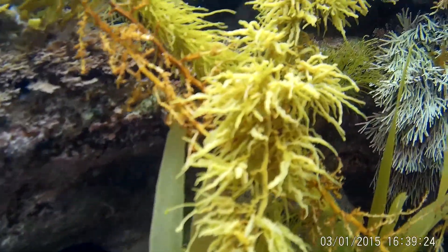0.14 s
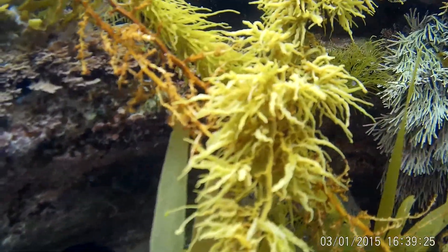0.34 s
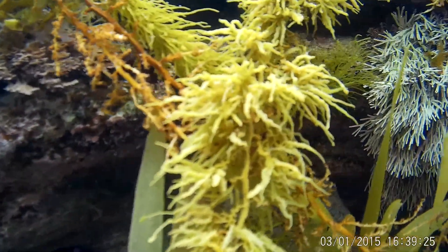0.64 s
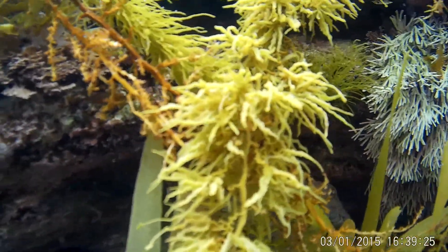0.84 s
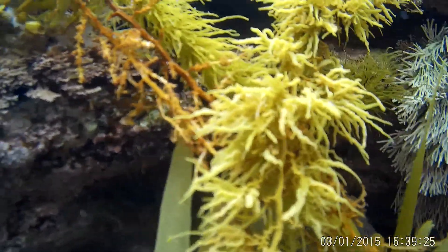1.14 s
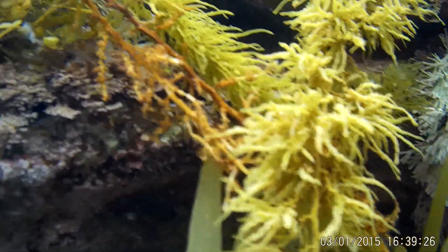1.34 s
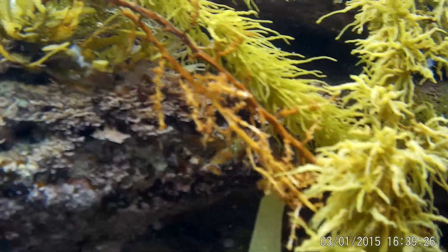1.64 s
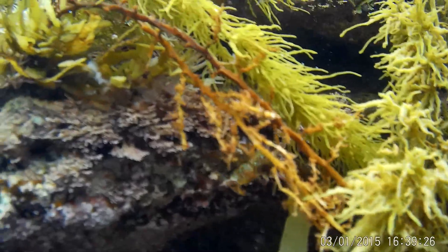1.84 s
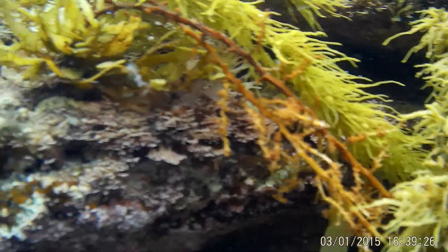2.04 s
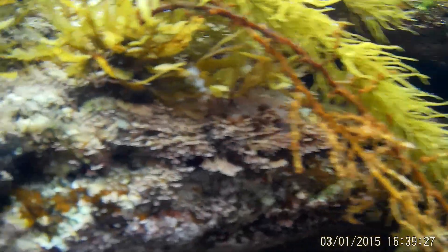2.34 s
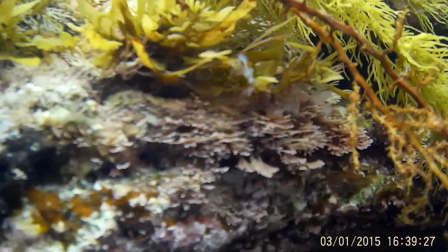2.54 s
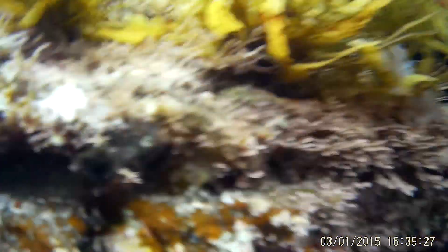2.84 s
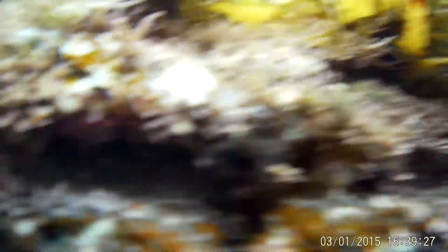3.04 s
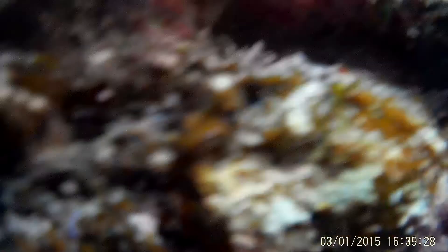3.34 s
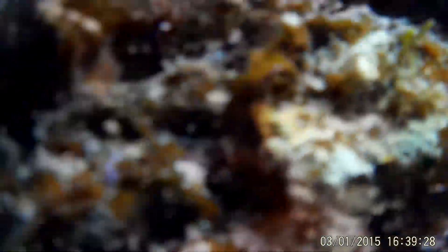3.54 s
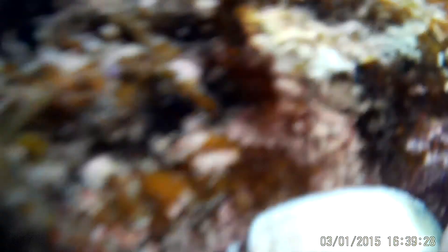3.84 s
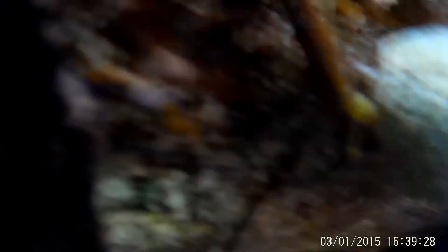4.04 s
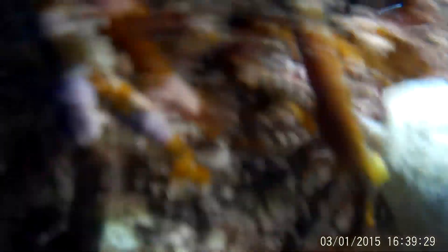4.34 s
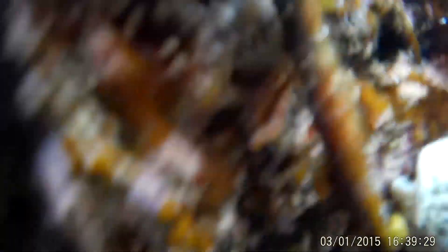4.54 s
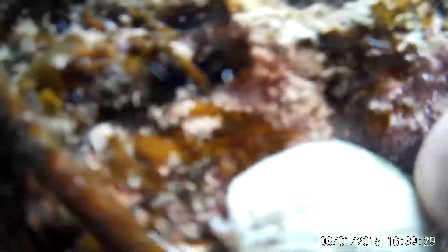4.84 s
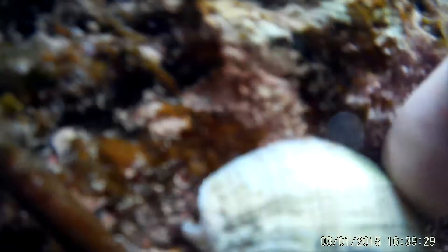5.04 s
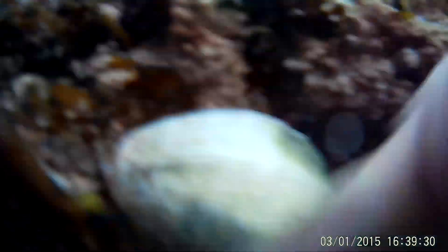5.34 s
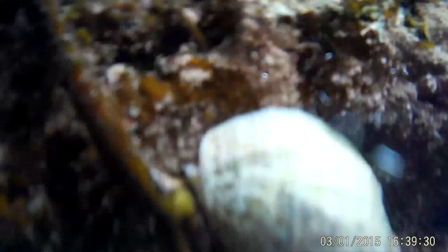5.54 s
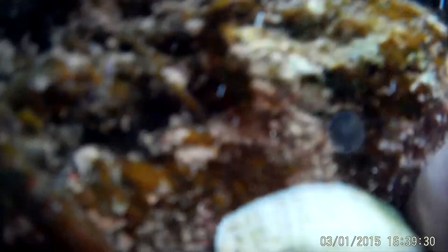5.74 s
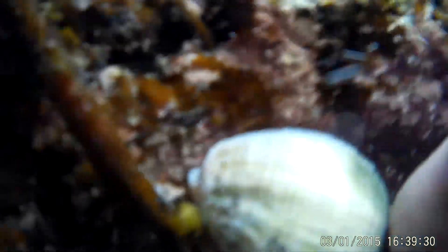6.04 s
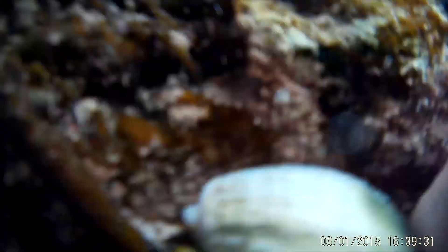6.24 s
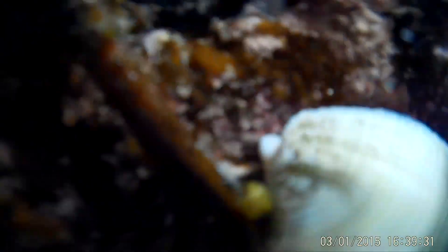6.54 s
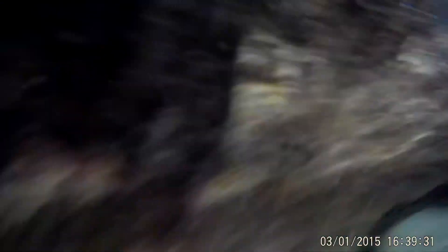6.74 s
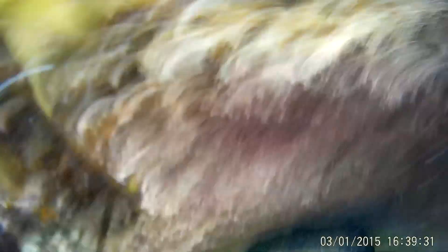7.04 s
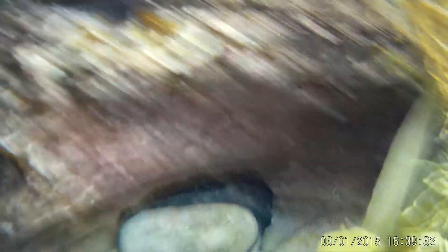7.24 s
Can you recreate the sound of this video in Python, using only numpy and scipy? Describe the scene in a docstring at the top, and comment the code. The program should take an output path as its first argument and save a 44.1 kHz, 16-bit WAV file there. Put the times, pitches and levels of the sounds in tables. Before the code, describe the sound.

Underwater in a rock pool, a microphone inside a plastic case first picks up only soft hiss, a thin whine and a faint focusing motor. Then a gritty rustle begins as the case pushes between rocks. Close, hollow knocks, bright shell snaps and short crunchy scrapes follow in uneven bursts, growing denser and louder toward the end, with low bumps and a soft rumble of water underneath.

```python
"""A faint lens drive whirrs over electronic hiss and whine, heard from inside a plastic camera housing.
From about 2.5 s the housing is pushed into a gap in a shallow rock pool: it rubs over weed, then knocks
and drags on encrusted rock, which rings its walls and faceplate. Shell edges snap against it with a short
bright ring, crust breaks off, and shoves thump through the case over the slow push of the water."""
import sys
import numpy as np
from scipy import signal
from scipy.fft import rfft, irfft, next_fast_len
from scipy.io import wavfile
from scipy.ndimage import uniform_filter1d, minimum_filter1d, map_coordinates

SR = 44100
rng = np.random.default_rng(int(sys.argv[2]) if len(sys.argv) > 2 else 0)


def master(y):
    """Save y as 16-bit WAV."""
    cut = np.clip(np.atleast_2d(y).T, -1, 1)
    pcm = np.round(cut * 32767)  # scale
    wavfile.write(sys.argv[1], SR, pcm.astype(np.int16))


N = 325899


def amp(db):
    """Decibels to gain."""
    return 10 ** (np.asarray(db) / 20)


def unit(x):
    """Scale to rms 1."""
    return x / np.sqrt(np.mean(x ** 2) + 1e-20)


def unit_hit(x):
    """Scale to rms 1 over the first 6 ms."""
    return x / np.sqrt(np.mean(x[:round(0.006 * SR)] ** 2) + 1e-20)


def clock(length=N):
    """Seconds at each sample."""
    return np.arange(length) / SR


def curve(rows):
    """(time, value) rows interpolated per sample."""
    return np.interp(clock(), *np.transpose(rows))


def wobble(rate_hz):
    """Smooth random curve, rate_hz knots a second."""
    knots = rng.standard_normal(int(N * rate_hz / SR) + 4)
    return map_coordinates(knots, [clock() * rate_hz], order=2)


def gate(start_s, end_s, edge_s):
    """1 between two times, with linear edges."""
    return np.clip(np.minimum(clock() - start_s, end_s - clock()) / edge_s + .5, 0, 1)


def add(track, time_s, sound):
    """Mix a sound in at time_s."""
    room = track[max(round(time_s * SR), 0):][:len(sound)]
    room += sound[:len(room)]


def resonate(x, modes):
    """Parallel resonators of alternating polarity."""
    size = next_fast_len(len(x) + 4096)
    f = np.fft.rfftfreq(size, 1 / SR)
    response = sum((-1) ** k * amp(db) * 1j * f * width_hz / (hz * hz - f * f + 1j * f * width_hz)
                   for k, (hz, width_hz, db) in enumerate(modes))
    return irfft(rfft(x, size) * response, size)[:len(x)]


def colour(x, spectrum):
    """Minimum-phase filter through (frequency [Hz], level [dB]) points."""
    size = 8192
    hz, db = np.transpose(spectrum)
    shape_db = np.interp(np.log(np.fft.rfftfreq(size, 1 / SR) + 1), np.log(hz), db)
    cepstrum = irfft(np.log(amp(shape_db) + 1e-6))
    cepstrum[1:size // 2] *= 2
    cepstrum[size // 2 + 1:] = 0
    return signal.fftconvolve(x, irfft(np.exp(rfft(cepstrum))))[:len(x)]


def band(x, low_hz, high_hz):
    """Band-pass: a panel radiates nothing under its first mode, a blunt contact has no fast motion."""
    return signal.sosfilt(signal.butter(4, [low_hz, high_hz], "band", fs=SR, output="sos"), x)


def wander(x, depth_db, patch_ms):
    """The contact point wanders, so each band swells and fades by itself."""
    frames = dict(nperseg=176, noverlap=132)  # 1 ms hop
    spectra = signal.stft(x, **frames)[2]
    field = uniform_filter1d(rng.standard_normal(spectra.shape), size=3, axis=0)
    field = uniform_filter1d(field, size=patch_ms, axis=1)
    gain = amp(depth_db * np.clip(unit(field), -2, 2))
    return signal.istft(spectra * gain, **frames)[1][:len(x)]


def crunch(decay_s, spike, power=1):
    """Force of one contact: a spike, then crumbling that dies away."""
    t = clock(SR // 16)
    force = rng.standard_normal(len(t)) * np.exp(-(t / decay_s) ** power)
    force[0] = spike * np.linalg.norm(force)
    return force


def grains(per_s, spread_db, smooth):
    """Micro-slips of uneven size on a bed of smooth friction."""
    sizes = amp(spread_db * np.minimum(rng.exponential(size=N), 4)) * rng.standard_normal(N)
    slips = sizes * (rng.random(N) < per_s / SR)
    return unit(slips) + smooth * rng.standard_normal(N)


# wall and faceplate modes: (frequency [Hz], width [Hz], level [dB])
WALL_MODES = [(337.2, 65, -2.5), (536.5, 45.4, -2.5), (707, 215, -10.5)]
PLATE_MODES = [(1252, 103, 5), (1439, 247, 4), (1815, 1050, -3.5), (2790, 1300, -4.5)]
# crumbling crust: (frequency [Hz], level [dB])
GRIT_SPECTRUM = [(1120, -19.5), (1900, -6.5), (2640, -1.5), (2970, -6.5), (3360, 1), (4240, -1.5),
                 (5590, 2), (6160, -4.5), (7770, 2), (9210, -6), (9980, -13), (14600, -23), (16000, -39)]


def impact(wall_db, plate_db, crack_db):
    """One blow rings the walls and faceplate and cracks the crust."""
    damping = np.exp(-(clock(SR // 16) / 0.0011) ** 2) + amp(1)  # the first swings ring about twice as strong for a millisecond
    wall = resonate(crunch(decay_s=0.00076, spike=1.07), WALL_MODES) * damping
    wall = unit_hit(band(wall, low_hz=174, high_hz=956))
    reach_hz = np.interp(crack_db - plate_db, [-20, 0], [1850, 3400])  # sharper contact, brighter plate
    plate = resonate(crunch(decay_s=0.0015, spike=2.2), PLATE_MODES) * damping
    plate = unit_hit(band(plate, low_hz=1025, high_hz=reach_hz))
    crack = colour(crunch(decay_s=0.0028, spike=0.45), GRIT_SPECTRUM)
    crack = unit_hit(wander(crack, depth_db=7, patch_ms=20))
    return amp(wall_db - 3) * wall + amp(plate_db - 1.36) * plate + amp(crack_db - 1.47) * crack


# knocks on rock: (time [s], level [dB], plate re wall [dB], crack re level [dB])
KNOCKS = [(2.586, -50.5, 1.5, -13), (2.693, -45, -2.5, -7), (3.391, -16, -6.5, -11),
          (3.719, -23, 11.5, -40), (3.895, -22.5, -4.5, -6), (3.935, -21, -11, 2), (4.339, -37.5, 3, -0.5),
          (5.146, -41.5, 0.5, -19.5), (5.231, -27.5, 11, -8), (5.251, -12, 4, -18), (5.263, -27.5, 18, -7),
          (5.313, -27, 10, -18.5), (5.356, -12, -7.5, -9.5), (5.364, -16.5, 5.5, -8),
          (5.868, -26.5, -9, -21), (6.397, -19.5, 12, -18), (6.515, -6, 11, -23), (6.558, -32, 1, -20),
          (6.576, -7, 11, -15), (6.67, -29.5, -6, 4), (6.699, -24, -3, -7), (6.734, -6, 15, -6.5),
          (6.81, -20.5, 1.5, -11), (6.873, -20.5, -6, -18), (6.921, -23, -8, 0), (7.138, -18, -1, -6),
          (7.179, -22.5, 30, -14), (7.242, -34.5, 5, -27), (7.268, -36.5, 16, -19)]


def knocks():
    """Where a knock lands splits its energy between wall and faceplate."""
    out = np.zeros(N)
    for time_s, db, plate_rel_db, crack_rel_db in KNOCKS:
        wall_db = db - 10 * np.log10(1 + amp(plate_rel_db) ** 2)
        add(out, time_s, impact(wall_db, wall_db + plate_rel_db, db + crack_rel_db))
    return out


# shell modes: (frequency [Hz], width [Hz], level [dB])
SHELL_MODES = [(3350, 170, -22), (5418, 570, -6.5), (6640, 180, -11), (7390, 350, -2)]
# crack of a shell edge: (frequency [Hz], level [dB])
SNAP_SPECTRUM = [(120, -18), (200, -26.5), (1400, -17), (2860, -22), (3430, -9), (4950, -11.5), (5520, 6),
                 (6400, -18), (7830, -4.5), (10700, -24.5), (13300, -19), (14900, -84), (16000, -19)]
# shell edges hitting the case: (time [s], level [dB])
SNAPS = [(3.381, -4.5), (3.422, -22), (3.91, -14.5), (3.929, -13), (4.045, -13), (4.908, -20), (5.027, -12),
         (5.046, -25), (5.191, -21), (5.333, -20), (5.445, -16), (5.627, -21), (5.731, -37), (5.82, -30),
         (5.851, -21), (5.914, -5), (6.142, -34), (6.184, -28), (6.221, -21.5), (6.303, -18.5),
         (6.531, -35), (6.726, -20.5), (6.832, -9.5), (6.84, -18.5), (7.01, -24), (7.109, -19.5),
         (7.123, -21)]


def shell_snaps():
    """An edge cracks with a bright, water-damped ring, springs back and touches again weakly."""
    out = np.zeros(N)
    for time_s, db in SNAPS:
        rebound_s = 0.013 * rng.uniform(.7, 1.3)
        for delay_s, drop_db in [(0, 0), (rebound_s, -19.5)]:
            crack = unit_hit(colour(crunch(decay_s=0.0029, spike=1, power=3), SNAP_SPECTRUM))
            ring = unit_hit(resonate(crunch(decay_s=0.0001, spike=5), SHELL_MODES))
            add(out, time_s + delay_s, amp(db + drop_db) * unit_hit(crack + amp(-7) * ring))
    return out


# crust breaking off: (time [s], level [dB])
CRACKS = [(2.716, -43.5), (2.809, -47.5), (3.14, -37), (3.965, -20), (4.034, -20), (4.122, -26.5),
          (4.198, -31.5), (5.519, -16), (5.605, -31), (5.959, -28.5), (6.026, -26.5), (6.587, -11),
          (6.636, -18), (6.646, -20), (6.657, -19.5), (6.961, -15.5), (6.982, -26), (7.033, -17),
          (7.044, -14), (7.071, -14), (7.095, -17.5)]


def crust_cracks():
    """Breaking crust is nearly all crack and barely stirs the case."""
    out = np.zeros(N)
    for time_s, db in CRACKS:
        add(out, time_s, impact(wall_db=db - 18.5, plate_db=db - 16.5, crack_db=db))
    return out


def drag_pressure(start_s, end_s, attack_s=0.016, sag_db_per_s=45.5, release_s=0.0053):
    """A drag bites, eases off as the case slides, and lets go."""
    t = clock()
    attack = np.clip((t - start_s) / attack_s + .5, 0, 1)
    sag = amp(-sag_db_per_s * np.clip(t - start_s, 0, end_s - start_s))
    release = np.exp(-np.clip(t - end_s, 0, 1) / release_s)
    return attack * sag * release


# drags over crust: (start [s], end [s], grit level [dB], wall re grit [dB], plate re wall [dB])
DRAGS = [(2.886, 2.92, -55, 5, -6), (3.358, 3.386, -31, 2, -5), (3.907, 3.943, -22, -10, -0.5),
         (4.029, 4.051, -27.5, -4, -10), (5.397, 5.51, -36.5, 3.5, 0), (5.59, 5.661, -38, -11.5, 3),
         (5.861, 5.96, -44.5, -0.5, 8.5), (5.981, 6.024, -35.5, -7, 6.5), (6.57, 6.676, -23.5, -8.5, 2.5),
         (6.805, 6.855, -31, -4, 0), (6.87, 6.978, -26, -3.5, -1.5), (6.926, 6.944, -10.5, -12.5, -2),
         (7.028, 7.188, -27.5, 1, -1)]


def drags(catches_per_s=55, catch_s=0.0013, catch_db=11.5):
    """Stick-slip sheds grit and drives the case modes; now and then a barnacle catches and lets go."""
    grit_gain, wall_gain, plate_gain = np.zeros((3, N))
    for start_s, end_s, db, wall_rel_db, plate_rel_db in DRAGS:
        pressure = amp(db) * drag_pressure(start_s, end_s)
        grit_gain += pressure
        wall_gain += pressure * amp(wall_rel_db)
        plate_gain += pressure * amp(wall_rel_db + plate_rel_db)
    onsets = rng.random(N) < catches_per_s / SR
    catches = signal.lfilter([1], [1, -np.exp(-1 / (catch_s * SR))], onsets)
    grip = amp(3.1 * wobble(130)) * (1 + amp(catch_db) * catches)
    force = lambda: grip * grains(per_s=1800, spread_db=1.5, smooth=0.37)
    wall = wall_gain * unit(band(resonate(force(), WALL_MODES), low_hz=269, high_hz=636))
    plate = plate_gain * unit(band(resonate(force(), PLATE_MODES), low_hz=1000, high_hz=3040))
    grit = grit_gain * unit(colour(force(), GRIT_SPECTRUM))
    return amp(-1) * wall + amp(-1.5) * plate + amp(1.4) * grit


# stick-slip squeaks: (time [s], level [dB], frequency [Hz])
SQUEAKS = [(5.383, -16.5, 5020), (5.401, -22, 3800), (5.491, -25, 3600), (6.62, -14.5, 7400),
           (6.646, -7, 6950), (6.669, -14.5, 2270), (7.032, -12, 3470)]


def squeaks():
    """A sharp edge chatters on the plastic for a few dozen cycles."""
    out = np.zeros(N)
    for time_s, db, hz in SQUEAKS:
        chatter = resonate(crunch(decay_s=0.0025, spike=0.29), [(hz, 0.055 * hz, 0)])
        add(out, time_s, amp(db - 6.5) * unit_hit(chatter))
    return out


# shoves and dull bumps: (time [s], level [dB], frequency [Hz], decay [s])
SHOVES = [(2.9, -35, 309, 0.02), (3.886, -19.5, 40.5, 0.011), (3.895, -21, 138, 0.0064),
          (3.911, -16.5, 50, 0.026), (4.035, -9, 44.6, 0.011), (4.068, -22, 75.5, 0.014),
          (4.133, -16.5, 52, 0.013), (4.489, -26.5, 42, 0.03), (5.352, -19.5, 61.4, 0.019),
          (5.357, -3.5, 365, 0.0066), (5.441, -9.5, 270, 0.0023), (5.72, -28.5, 310, 0.0041),
          (6.16, -31.5, 323, 0.0067), (6.567, -17, 55.7, 0.022), (6.621, -14, 342, 0.0055),
          (6.92, -20, 374, 0.0082)]


def shoves(attack_s=0.00022):
    """Each shove gives the whole case a heavy, quickly damped swing."""
    out = np.zeros(N)
    t = clock(SR // 5)
    for time_s, db, hz, decay_s in SHOVES:
        envelope = np.exp(-t / decay_s) * (1 - np.exp(-t / attack_s))
        add(out, time_s, amp(db + 3) * envelope * np.sin(2 * np.pi * hz * t))
    return out


# firmness of the rubbing: (time [s], level [dB])
RUB_LEVEL = [(2.55, -72), (2.98, -49.5), (3.25, -49), (3.42, -39), (3.5, -60.5), (3.66, -53.5), (3.77, -61),
             (3.92, -38), (4.19, -45), (4.26, -59.5), (4.58, -48), (4.82, -63.5), (4.96, -51),
             (5.12, -61.5), (5.4, -45), (5.69, -45.5), (5.78, -53.5), (6.02, -44), (6.1, -53),
             (6.18, -48.5), (6.52, -52), (6.7, -42), (6.78, -45.5), (7.0, -45.5), (7.3, -50.5), (7.39, -58)]
# case's share of the rubbing as it wedges deeper: (time [s], level [dB])
WEDGE_LEVEL = [(3, 1.5), (4.2, 4), (5.3, 3.5), (7.3, 3)]
# rustle of weed and fine crust: (frequency [Hz], level [dB])
RUSTLE_SPECTRUM = [(1060, -28), (1800, -12.5), (2220, -13.5), (2500, -3.5), (3140, -3), (5960, -6),
                   (7160, -2), (11800, -16), (14600, -25), (16000, -42)]


def rubbing():
    """Weed and fine crust brush the case with small dense grains."""
    touch = gate(2.5, 8, edge_s=0.2) * amp(curve(RUB_LEVEL) + 2 * wobble(45))
    force = lambda: grains(per_s=1100, spread_db=5, smooth=1)
    wall = unit(resonate(force(), WALL_MODES))
    plate = unit(band(resonate(force(), PLATE_MODES), low_hz=860, high_hz=1950))
    case = amp(curve(WEDGE_LEVEL)) * (amp(-6) * wall + amp(-11) * plate)
    rustle = unit(wander(colour(force(), RUSTLE_SPECTRUM), depth_db=4, patch_ms=10))
    return touch * (case + amp(-1.5) * rustle)


def grain_ticks(per_s=55):
    """Loose grains tick on the case as it rubs, louder under a firmer touch."""
    size_db = -np.clip(rng.standard_normal(N), -2, 1.5)
    hits = amp(size_db) * (rng.random(N) < per_s / SR)
    force = signal.fftconvolve(hits, crunch(decay_s=0.00087, spike=0.8))[:N]
    touch = gate(2.65, 8, edge_s=0.05) * amp(curve(RUB_LEVEL) - 7)
    return touch * unit(colour(force, GRIT_SPECTRUM))


# water pushing on the case: (time [s], level [dB])
SWAY_LEVEL = [(0, -67.5), (2.2, -73), (2.8, -56.5), (4.8, -52), (5.3, -47), (6.5, -47.5), (6.95, -39.5),
              (7.15, -42.5), (7.39, -62)]
# water rumble: (frequency [Hz], level [dB])
SLOSH_SPECTRUM = [(12, -55), (20, 9), (31, -8), (92, -17.5), (146, -21.5), (250, -27.5), (320, -64),
                  (550, -120)]


def water():
    """Slow pressure of the pool rumbles on the case."""
    return amp(curve(SWAY_LEVEL) + 6) * unit(colour(rng.standard_normal(N), SLOSH_SPECTRUM))


# lens drive modes: (frequency [Hz], width [Hz], level [dB])
LENS_MODES = [(5260, 110, 5.5), (7080, 520, 6.5)]
# focusing runs: (start [s], end [s], level [dB])
FOCUS_RUNS = [(0.2, 1.46, 0.5), (2.01, 2.3, -3.5)]
# thin drive tones: (centre [Hz], hop spread [Hz], level [dB])
LENS_TONES = [(5300, 190, -4), (6950, 190, 0.5), (5880, 870, -7), (4580, 370, -10.5), (11900, 1500, -11)]


def lens_drive():
    """The drive whirrs while focusing and hops between thin tones while the camera is jostled."""
    running = sum(amp(db) * gate(start_s, end_s, edge_s=0.022) for start_s, end_s, db in FOCUS_RUNS)
    whirr = amp(-69.5) * running * unit(resonate(rng.standard_normal(N), LENS_MODES))
    jostled = amp(-64.5) * gate(-1, 0.235, edge_s=0.015) + amp(-57.5) * gate(2.9, 8, edge_s=0.4)
    tones = np.zeros(N)
    for centre_hz, spread_hz, db in LENS_TONES:
        hops_per_s = 36 * amp(3 * wobble(17))
        hop = np.cumsum(hops_per_s / SR).astype(int)
        detune, loudness = rng.standard_normal((hop[-1] + 1, 2)).T
        pitch_hz = np.clip(centre_hz + spread_hz * detune[hop], 3000, 15000)
        hop_db = 15 * np.minimum(loudness[hop], 1)
        envelope = unit(uniform_filter1d(amp(hop_db), size=300))
        tones += amp(db) * envelope * np.sin(2 * np.pi * np.cumsum(pitch_hz) / SR)
    return whirr + jostled * tones


# electronic whine and hiss: (frequency [Hz], level [dB])
WHINE_TONES = [(9485, -70.5), (9555, -77)]
HISS_SPECTRUM = [(59, -61), (100, 0), (424, -12), (634, -14), (1030, -18), (6420, -26), (9610, -21),
                 (16000, -26.5)]


def electronics():
    """Steady hiss and a beating pair of high tones that grows louder near 2.8 s."""
    whine = sum(amp(db - 3) * np.sin(2 * np.pi * hz * clock()) for hz, db in WHINE_TONES)
    rise_db = 9.2 * gate(2.76, 8, edge_s=0.33)
    hiss = unit(colour(rng.standard_normal(N), HISS_SPECTRUM))
    return amp(rise_db) * whine + amp(-66.5) * hiss


def scene():
    """Everything reaches one microphone through the case."""
    hits = shell_snaps() + knocks() + crust_cracks() + shoves()
    friction = squeaks() + drags() + rubbing() + grain_ticks()
    background = water() + lens_drive() + electronics()
    return (hits + friction + background)[None]


def record(dry):
    """A very fast limiter flattens the hardest hits; a steep low-pass follows."""
    ceiling, cutoff_hz = 0.76, 15800
    needed = np.minimum(1, ceiling / (np.abs(dry) + 1e-9))
    gain = uniform_filter1d(minimum_filter1d(needed, size=5), size=3)
    lowpass = signal.ellip(10, .2, 80, cutoff_hz, fs=SR, output="sos")
    return signal.sosfilt(lowpass, dry * gain)


dry = scene()
out = record(dry)
master(out)
```